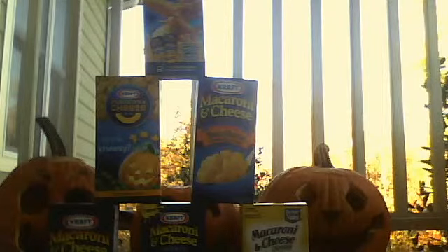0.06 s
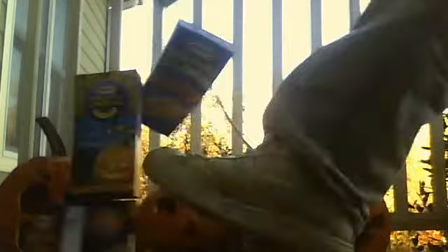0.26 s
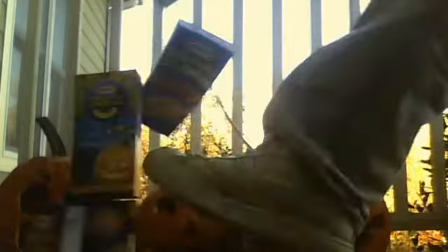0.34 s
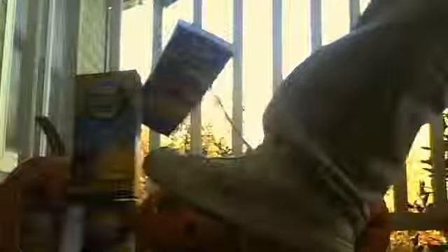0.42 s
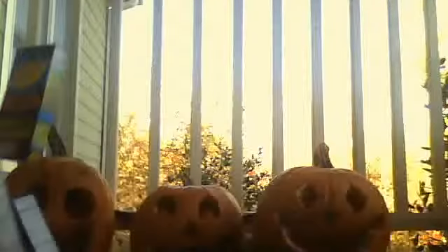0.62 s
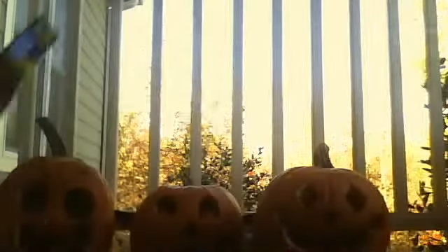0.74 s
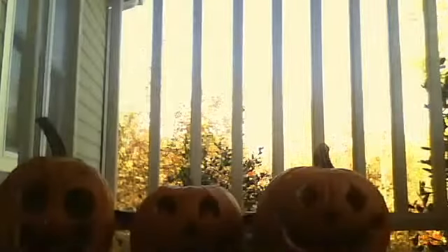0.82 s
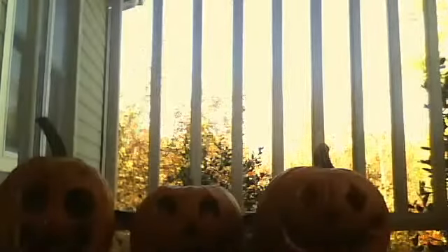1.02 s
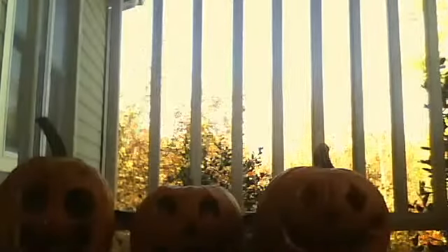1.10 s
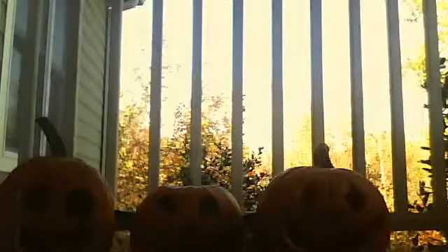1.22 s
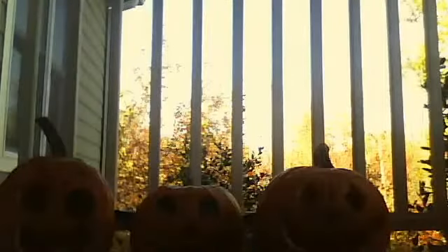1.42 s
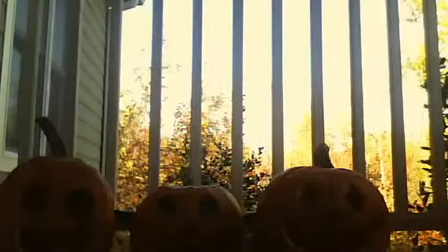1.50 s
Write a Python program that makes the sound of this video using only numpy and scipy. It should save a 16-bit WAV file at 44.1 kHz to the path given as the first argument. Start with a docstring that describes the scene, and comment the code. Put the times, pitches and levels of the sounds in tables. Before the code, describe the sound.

Small cardboard boxes of dry pasta are swept off a porch ledge. Faint outdoor hush and tiny scuffs until 0.2 s, then a sudden loud smack and rattle. A short lull leads to dense hollow knocks from 0.5 to 0.75 s, another snapping hit at 0.84, weaker rattles, then a last cluster around 1.19-1.25 s. Pasta settles into quiet by 1.5 s. Close small microphone, clipped peaks, little echo.

```python
"""Small cardboard boxes of dry pasta are swept off a ledge on a porch by a hand.
Each knock throws the pasta against the card walls, whose modes ring briefly; single walls ring out hollow
and card edges snap. Loose pieces tick at high resonances and settle, and filtered noise makes low thuds.
A small microphone's input stage overloads on the loudest knocks; faint outdoor noise and scuffs lie below."""
import sys
import numpy as np
from scipy import signal
from scipy.io import wavfile

SR = 44100
rng = np.random.default_rng(int(sys.argv[2]) if len(sys.argv) > 2 else 0)


def inscribe(sig):
    """Save sig as 16-bit PCM at rate SR to the path in sys.argv[1].

    A 1-D sig is mono; a 2-D sig holds one channel per row.
    Samples are clipped to [-1, 1] before scaling.
    """
    pcm = np.round(np.clip(np.atleast_2d(sig).T, -1, 1) * 32767)
    wavfile.write(sys.argv[1], SR, pcm.astype(np.int16))


def voltage_ratio(level):
    """Linear amplitude factor for a level in decibels (scalar or array-like)."""
    return 10 ** (np.asarray(level, float) / 20)


N = 68355   # length in samples

# Knocks of the boxes. Each row: start in seconds, level in dB, centre of the wall sound in Hz,
# ticks relative to that level in dB, thud relative to it in dB, hold in seconds,
# dying time t60 in seconds, first contact in dB.
KNOCKS = [(0.21, -18, 1290, -10.5, -11, .004, 0.098, -16), (0.2162, -0.5, 855, -14, -30, 0.003, 0.04, 6),
          (.228, -2.5, 910, -14, -14, 0.0071, 0.018, 1), (0.237, -4.5, 1400, -9, -15, 0.0021, 0.074, 10),
          (0.261, -11.5, 890, -8.5, -20, 0.0018, 0.089, 6.5),
          (0.277, -13.5, 1210, -10, -28, 0.0059, 0.19, 7), (.284, -10.5, 990, -16, -31, 0.007, 0.034, -14),
          (0.323, -17, 1000, -7.5, -24, 0.0046, 0.078, 4), (0.357, -22, 1400, -14, -21, 0.014, 0.22, 7),
          (0.403, -14.5, 810, -5, -9, 0.0068, 0.054, 4.5), (.420, -16, 1030, -14, -20, 0.0057, 0.3, 8),
          (0.5, -13, 690, -9, -13, 0.0072, 0.07, 6.5), (0.517, -16, 937, -6.5, -15, 0.007, 0.11, 6),
          (0.533, -6.5, 784, -11, -18.5, 0.0023, 0.13, 4.5),
          (0.567, -16, 1110, -21.5, -13.5, 0.014, 0.097, 3.5),
          (0.586, -7, 1300, -8.5, -22.5, .008, 0.088, -3), (0.598, -3, 890, -13, -26, 0.0022, 0.024, 0.5),
          (0.611, -17, 1000, -8, -9, 0.037, .1, -10), (.647, -0.5, 1050, -19.5, -24, 0.0053, 0.038, -0.5),
          (0.665, -6, 1140, -19, -31, 0.0046, 0.044, 9), (0.687, -10, 1000, -16.5, -33, 0.0027, 0.12, 5),
          (0.7, -6, 860, -26.5, -30.5, 0.0029, 0.11, 1.5), (0.711, -3, 1170, -8.5, -24, 0.0033, 0.037, 3),
          (0.717, -7, 970, -11, -27, 0.011, 0.03, -8), (0.728, -0.5, 1230, -14, -8.5, 0.0022, 0.024, 7),
          (0.796, -21, 910, -12.5, -14.5, 0.0055, 0.2, -11), (.838, -4, 1065, -8, -15, 0.013, 0.046, 5.5),
          (0.863, -11, 925, -20, -16, 0.011, 0.033, 4), (0.89, -23.5, 1010, -25, -11, 0.02, 0.079, -2),
          (.907, -20, 1100, -15, -21, 0.026, .08, 6), (0.944, -17, 1180, -18, -23, .002, 0.036, 1),
          (0.957, -16.5, 1170, -21, -39.5, .002, 0.08, 10.5),
          (.987, -24, 1330, -26, -28, 0.0034, 0.026, 11), (1.008, -32, 1300, -20, -28, 0.003, 0.056, 14),
          (1.061, -24.5, 830, -4.5, -10, 0.023, 0.053, 9),
          (1.074, -13.5, 1080, -15.5, -23, .015, 0.17, -0.5),
          (1.149, -21.5, 970, -18, -25, 0.058, 0.46, -6), (1.187, -6.5, 1070, -14.5, -22, 0.011, .11, -13),
          (1.230, -10, 1200, -10.5, -19, 0.0072, 0.036, 0),
          (1.247, -11, 1190, -34, -20.5, 0.013, 0.049, 6.5), (1.269, -21.5, 1020, -26, -38, .012, 0.083, 5),
          (1.315, -21.5, 1100, -20, -29, 0.006, 0.079, 5.5),
          (1.329, -22, 1071, -16.5, -30, 0.0058, 0.075, 2.5),
          (1.345, -23.5, 1180, -29, -41, 0.0054, 0.033, 7.5), (1.391, -38, 940, -21, -37, 0.026, .08, 6),
          (1.426, -34, 1100, -18, -37, 0.0043, 0.037, 7), (1.451, -39, 1010, -22, -32, 0.0025, 0.018, 13),
          (1.507, -48, 890, -4.5, -7, 0.0093, 0.033, -8)]
# Modes of the card walls. Each row: frequency in Hz, level in dB, t60 in seconds.
WALLS = [(343, -4, 0.037), (409, 2, 0.023), (507, -0.5, 0.018), (594, -2, 0.017), (660, -1.5, 0.013),
         (765, -3.5, 0.023), (837, -2, 0.019), (960, 0, 0.026), (1090, -2, 0.023), (1158, -1.5, 0.017),
         (1320, 2.5, 0.014), (1400, 2, 0.011), (1500, -2, 0.015), (1627, 0, 0.017), (1758, 0, 0.014),
         (2250, -4.5, 0.011)]
# Single card walls ringing out hollow. Each row: start in seconds, level in dB, pitch in Hz, t60 in seconds.
HOLLOWS = [(0.218, -19.5, 930, 0.045), (.502, -14, 605, 0.044), (.535, -12, 790, .08),
           (.649, -10.5, 1032, 0.033), (.667, -18, 1160, 0.026), (0.73, -8, 1192, .05),
           (1.192, -8.5, 986, 0.075), (1.23, -11.5, 1127, 0.029), (1.244, -12, 1240, 0.034)]
# Bright snaps of a card edge. Each row: start in seconds, level in dB, lower pitch in Hz.
CRACKS = [(0.216, -12.5, 3060), (.243, -19, 3570), (.261, -11.5, 3260), (.325, -20.5, 3100),
          (0.408, -25, 3050), (0.591, -21, 3060), (0.74, -18.5, 3810), (.842, -7, 2980), (1.196, -21, 3320)]
# Spectrum of the pasta ticks. Each row: frequency in Hz, relative level in dB per Hz.
TICK_SPECTRUM = [(1180, -35), (2000, -10), (2260, -0.5), (2960, 1), (4630, -5), (5030, -8.5), (6950, -16),
                 (9150, -29), (10400, -51), (13500, -76), (22000, -120)]
# Reflections from wall and railing. Each row: delay in seconds, level in dB.
ECHOES = [(.011, -22.5), (.019, -22.5), (.031, -23), (.047, -18.5)]
# Faint scuffs as the hand nears. Each row: centre in seconds, level in dB, length in seconds, pitch in Hz.
SCUFFS = [(0.01, -57, 0.13, 250), (0.07, -58.5, .012, 1500), (0.143, -57, 0.0078, 1600),
          (.203, -51.5, 0.011, 2000), (0.204, -55, 0.015, 300)]
# Spectrum of the outdoor noise. Each row: frequency in Hz, relative level in dB per Hz.
AIR_SPECTRUM = [(18, -61), (30, -19), (87, -14.5), (181, -7), (317, -10.5), (1400, -11.5), (4480, -20.5),
                (4820, -21), (5320, -16.5), (10000, -48.5), (13000, -62), (22000, -120)]

# Envelope of a knock: the pasta keeps settling after it
ATTACK_S, SETTLE_DB, SETTLE_T60_S = 0.0017, -13.5, 0.5
# Pasta thrown at the walls
THROWS_PER_S, THROW_SPREAD_DB, WALL_DB = 3000, 2, -10
CONTACT_S = 0.0011   # the first click of a 0 dB contact carries the energy of this much throwing
FAVOUR_OCT, FAVOUR_DB = 0.76, -4   # a mode this far from a knock's centre is changed by this much
SCATTER_DB = 1.5   # chance spread of each mode's level from knock to knock
CRACK_T60_S = 0.012
# Ticks settle at this share of the walls' settling time, bright ones soonest
TICKS_PER_S, TICK_SPREAD_DB, TICK_CYCLES, TICK_DB = 6000, -0.5, 37, -7
TICK_SETTLE_SHARE, BRIGHT_SETTLE_SHARE, BRIGHT_FROM_HZ = 1, 0.57, 3200
THUD_LOW_HZ, THUD_HIGH_HZ, THUD_LAG_S, THUD_SLOWER, THUD_DB = 122, 254, 0.0024, 1.35, -9
AIR_DB = -60.5
SCUFF_SPAN = 1.67   # band edges as a factor around the pitch
# Microphone and its input stage
PUFF_S, PUFF_DB, PUFF_LENGTH_S = 0.217, -28.5, 0.0017
MIC_LOW_HZ, MIC_HIGH_HZ = 135, 8330
INPUT_RUMBLE_DB, INPUT_RUMBLE_HZ = -83.5, 60
LOPSIDED, OFFSET, CEILING = 0.099, 0.0002, 0.72   # share of the squared signal, amplitude, amplitude


def rms_one(x):
    """Normalization: divide a signal by its root mean square."""
    return x / np.sqrt(np.mean(x ** 2) + 1e-20)


def at_hz(points, hz):
    """Spectral interpolation: levels in dB run straight between points on a log frequency axis."""
    table_hz, table_db = np.array(points).T
    return np.interp(np.log(hz), np.log(table_hz), table_db)


def ring(clicks, hz, t60):
    """Damped resonance: a two-pole filter answers a unit click with a decaying sine."""
    radius = voltage_ratio(-60 / (max(t60, 1e-4) * SR))
    angle = 2 * np.pi * hz / SR
    return signal.lfilter([0, np.sin(angle)], [1, -2 * radius * np.cos(angle), radius ** 2], clicks + 1e-18)


def band(x, low_hz, high_hz):
    """Band selection: a Butterworth filter passes what lies between two frequencies."""
    return signal.sosfilt(signal.butter(2, [low_hz, high_hz], "band", fs=SR, output="sos"), x)


def grains(size, per_s, spread_db):
    """Random impacts: clicks of either sign and uneven size fall independently of each other."""
    heights = voltage_ratio(spread_db * np.minimum(rng.exponential(1, size), 4)) * rng.choice([-1, 1], size)
    return heights * (rng.random(size) < per_s / SR)


def shape(t, hold, t60, settle=1):
    """Exponential relaxation: attack, hold and decay, with a lower settling tail."""
    t, late = np.maximum(t, 0), np.maximum(t - hold, 0)
    dying = voltage_ratio(-60 * late / max(t60, 0.01))
    settling = voltage_ratio(SETTLE_DB - 60 * late / (settle * SETTLE_T60_S))
    return (1 - np.exp(-t / ATTACK_S)) * (dying + settling)


def force(column, lag_s=0, slower=1, settle=1):
    """Energy addition: the squared envelopes of all knocks sum, at the level in one KNOCKS column."""
    t = np.arange(N) / SR
    power = np.zeros(N)
    for knock in KNOCKS:
        start, level_db, hold, t60 = knock[0], knock[1], knock[5], knock[6]
        envelope = shape(t - start - lag_s, hold, slower * t60, settle)
        power += (voltage_ratio(level_db + knock[column]) * envelope) ** 2
    return np.sqrt(power)


def walls():
    """Modal excitation: a first contact, then thrown pasta, ring wall modes of new strength at each knock."""
    size = SR // 2
    out, t = np.zeros(N + size), np.arange(size) / SR
    scatter_db = SCATTER_DB * rng.standard_normal((len(KNOCKS), len(WALLS)))
    for (start, level_db, centre_hz, _, _, hold, t60, first_db), own_db in zip(KNOCKS, scatter_db):
        push = rms_one(grains(size, THROWS_PER_S, THROW_SPREAD_DB)) * shape(t, hold, t60)
        # the contact is a click and a weaker opposite one
        push[[0, 25]] += voltage_ratio(first_db) * np.sqrt(CONTACT_S * SR) * np.array([1, -0.7])
        signs = rng.choice([-1, 1], len(WALLS))
        sound, power = np.zeros(size), 0
        for (hz, mode_db, mode_t60), sign, chance_db in zip(WALLS, signs, own_db):
            distance = np.log2(hz / centre_hz) / FAVOUR_OCT
            favour_db = FAVOUR_DB * min(distance ** 2, 3.0)
            gain = voltage_ratio(mode_db + favour_db + chance_db)
            sound += gain * sign * ring(push, hz, mode_t60)
            power += gain ** 2 * mode_t60 * SR / 28   # energy of the decaying sine
        first = int(start * SR)
        out[first:first + size] += voltage_ratio(level_db + WALL_DB) * sound / np.sqrt(power)
    return out[:N]


def hollows():
    """Modal resonance: one card wall rings out a clear hollow note."""
    out = np.zeros(N)
    for start, level_db, hz, t60 in HOLLOWS:
        click = np.zeros(N)
        click[int(start * SR)] = voltage_ratio(level_db)
        out += ring(click, hz, t60)
    return out


def cracks():
    """Impulse response: each snap of a card edge rings a close pair of high modes in opposition."""
    out = np.zeros(N)
    for start, level_db, hz in CRACKS:
        click = np.zeros(N)
        click[int(start * SR)] = voltage_ratio(level_db)
        out += ring(click, hz, CRACK_T60_S) - ring(click, 1.12 * hz, CRACK_T60_S)
    return out


def ticks():
    """Collision of small hard bodies: each click of pasta on pasta rings one of 28 high pitches."""
    clicks = grains(N, TICKS_PER_S, TICK_SPREAD_DB)
    pitches = np.geomspace(2100, 10000, 28)
    dealt = rng.integers(0, len(pitches), N)
    dull = force(column=3, settle=TICK_SETTLE_SHARE)
    bright = force(column=3, settle=BRIGHT_SETTLE_SHARE)
    driven = clicks * np.where(pitches[dealt] > BRIGHT_FROM_HZ, bright, dull)
    sound, steady = np.zeros(N), np.zeros(N)
    for k, hz in enumerate(pitches):
        gain = voltage_ratio(at_hz(TICK_SPECTRUM, hz)) * hz
        sound += gain * ring(driven * (dealt == k), hz, TICK_CYCLES / hz)
        steady += gain * ring(clicks * (dealt == k), hz, TICK_CYCLES / hz)
    return voltage_ratio(TICK_DB) * sound / np.std(steady)   # level set by the ticks without envelope


def thuds():
    """Low-frequency response: floor and air in the boxes answer as low noise, later and longer."""
    low = band(rng.standard_normal(N), THUD_LOW_HZ, THUD_HIGH_HZ)
    low = band(low, THUD_LOW_HZ, 2 * THUD_HIGH_HZ)
    return voltage_ratio(THUD_DB) * rms_one(low) * force(column=4, lag_s=THUD_LAG_S, slower=THUD_SLOWER)


def scuffs():
    """Friction noise: each faint scuff is band noise under a bell-shaped envelope."""
    white, t = rng.standard_normal(N), np.arange(N) / SR
    out = np.zeros(N)
    for centre, level_db, length, hz in SCUFFS:
        bell = np.exp(-((t - centre) / length * 2) ** 2)
        out += voltage_ratio(level_db) * bell * rms_one(band(white, hz / SCUFF_SPAN, hz * SCUFF_SPAN))
    return out


def air():
    """Stationary noise: half-octave bands of white noise build the steady outdoor spectrum."""
    white = rng.standard_normal((2, N))
    edges = 30 * 2 ** np.arange(0, 8.6, 0.5)
    hush = np.zeros(N)
    for k, (low, high) in enumerate(zip(edges, edges[1:])):
        # neighbouring bands use independent noise
        hush += voltage_ratio(at_hz(AIR_SPECTRUM, np.sqrt(low * high))) * band(white[k % 2], low, high)
    return voltage_ratio(AIR_DB) * rms_one(hush)


def scene():
    """Superposition: the boxes and their delayed reflections add to the outdoor noise and scuffs."""
    boxes = walls() + hollows() + cracks() + ticks() + thuds()
    echoes = np.zeros(N)
    for delay, level_db in ECHOES:
        echoes += voltage_ratio(level_db) * np.concatenate([np.zeros(int(delay * SR)), boxes])[:N]
    return (boxes + echoes + air() + scuffs())[None]


def puff():
    """Pressure pulse: air pushed by the first blow moves the microphone's membrane one way."""
    return voltage_ratio(PUFF_DB) * np.exp(-((np.arange(N) / SR - PUFF_S) / PUFF_LENGTH_S) ** 2)


def input_rumble():
    """Electrical noise: low-passed white noise of the input stage."""
    rumble = signal.lfilter(*signal.butter(2, INPUT_RUMBLE_HZ, fs=SR), rng.standard_normal(N))
    return voltage_ratio(INPUT_RUMBLE_DB) * rms_one(rumble)


def low_pass(x):
    """Removes everything above the highest recorded frequency."""
    return signal.sosfilt(signal.butter(12, 10510, fs=SR, output="sos"), x)


def record(dry):
    """Nonlinear transduction: band-limited sound meets an uneven response and a soft ceiling."""
    mic = signal.butter(4, [MIC_LOW_HZ, MIC_HIGH_HZ], "band", fs=SR, output="sos")
    heard = signal.sosfilt(mic, dry) + puff()
    # the square bends one side more than the other; the filter removes its steady part
    uneven = LOPSIDED * signal.lfilter([1, -1], [1, -0.998], heard ** 2)
    bent = heard + uneven + input_rumble() + OFFSET
    limited = bent / (1 + np.abs(bent / CEILING) ** 8) ** (1 / 8)
    return low_pass(limited)


dry = scene()
out = record(dry)
inscribe(out)
```